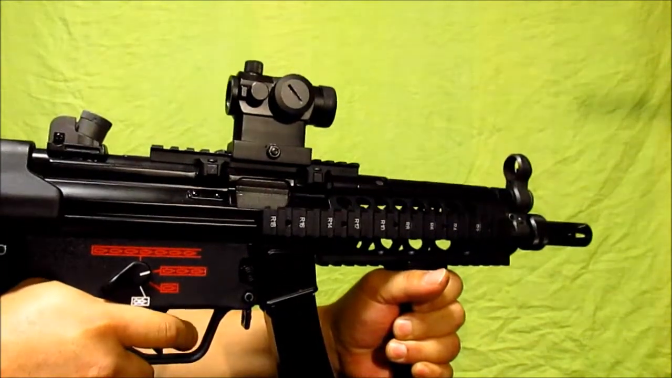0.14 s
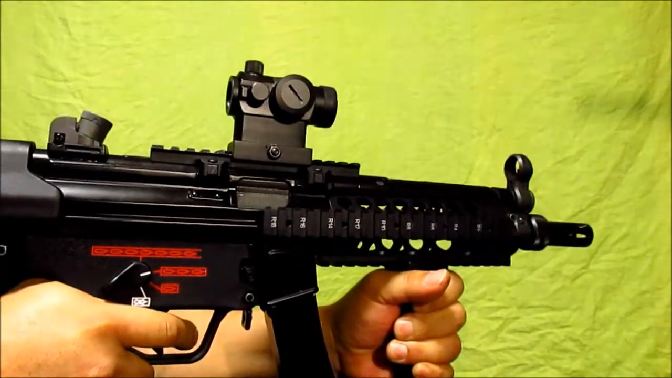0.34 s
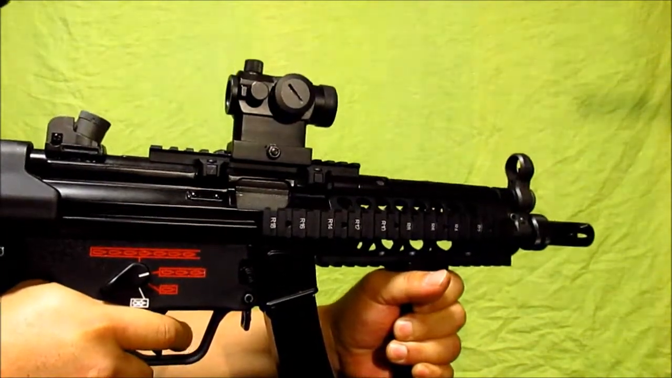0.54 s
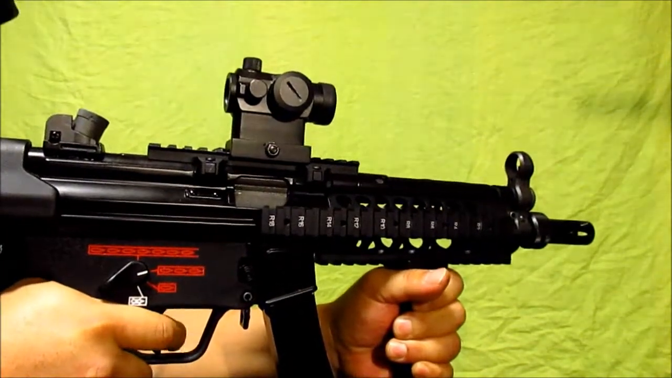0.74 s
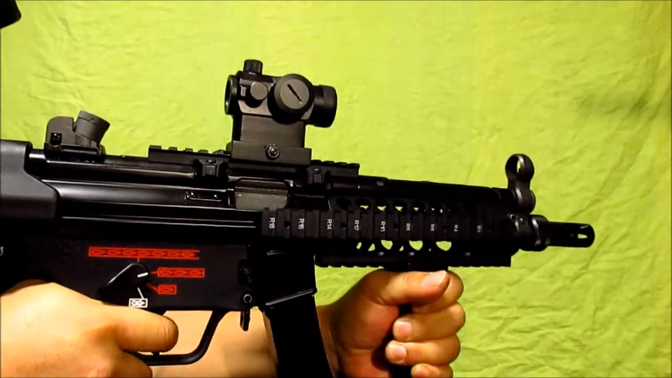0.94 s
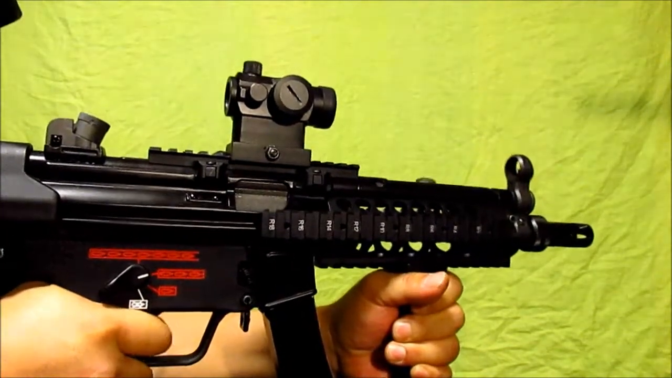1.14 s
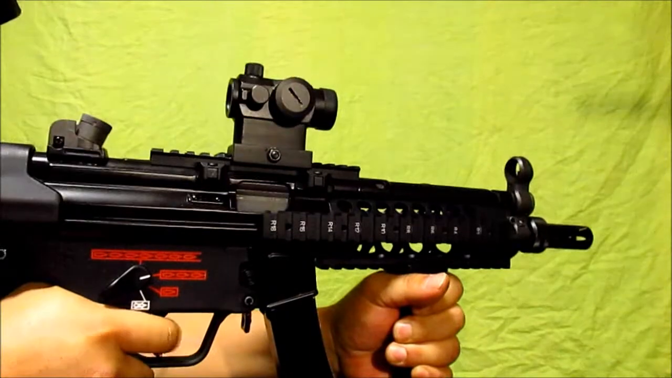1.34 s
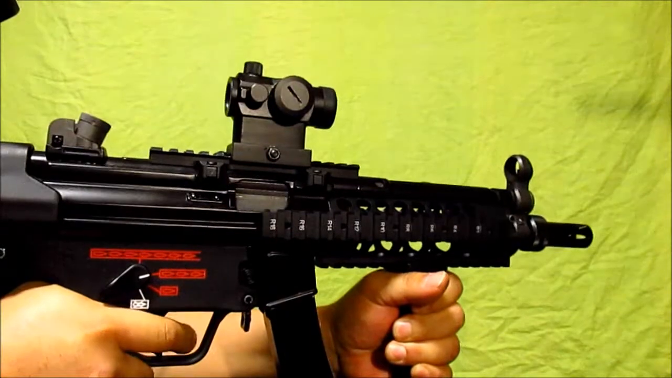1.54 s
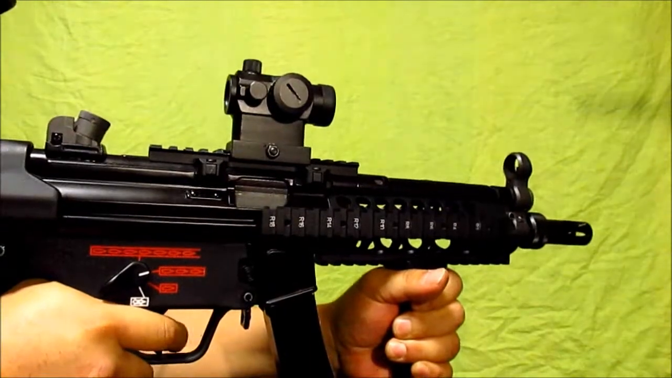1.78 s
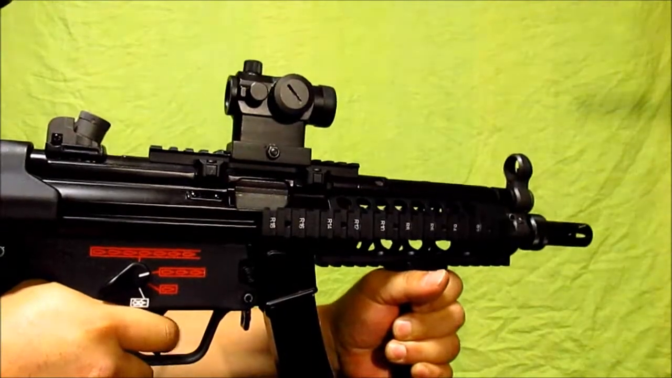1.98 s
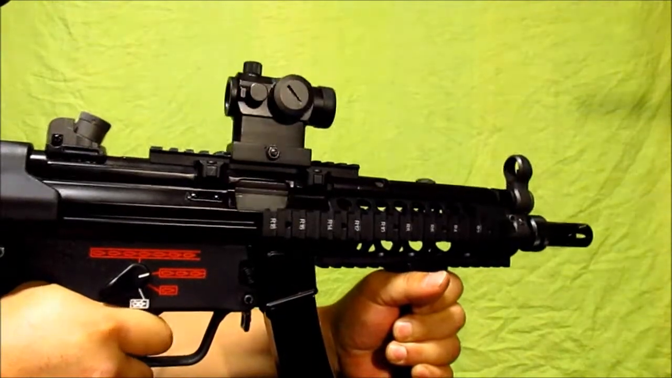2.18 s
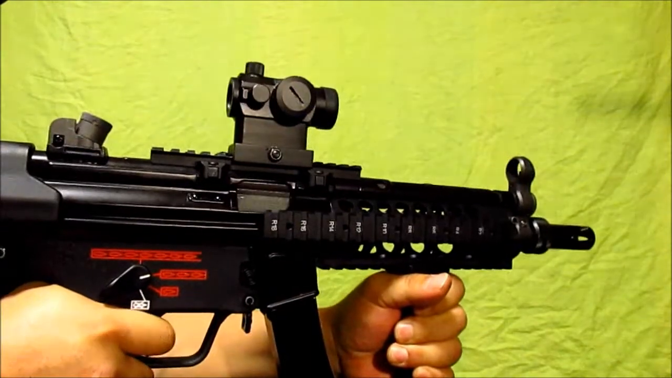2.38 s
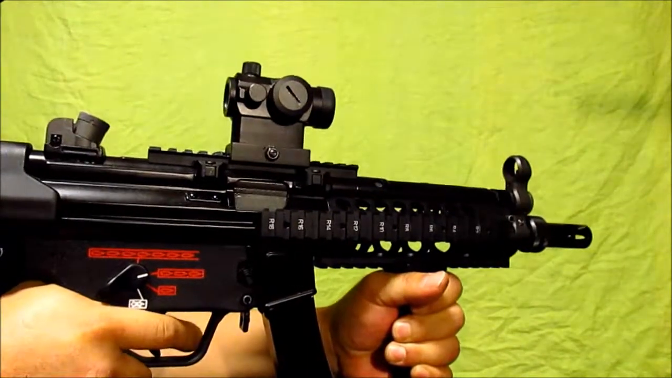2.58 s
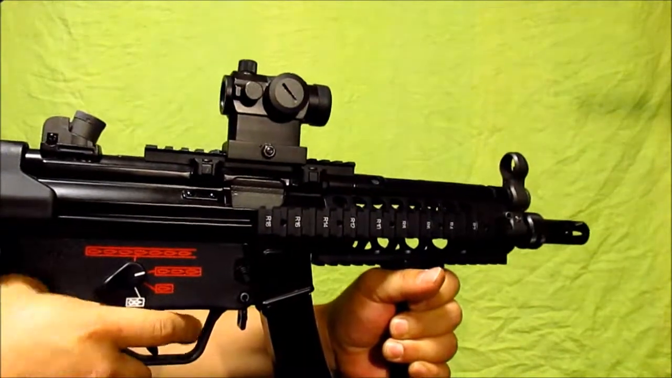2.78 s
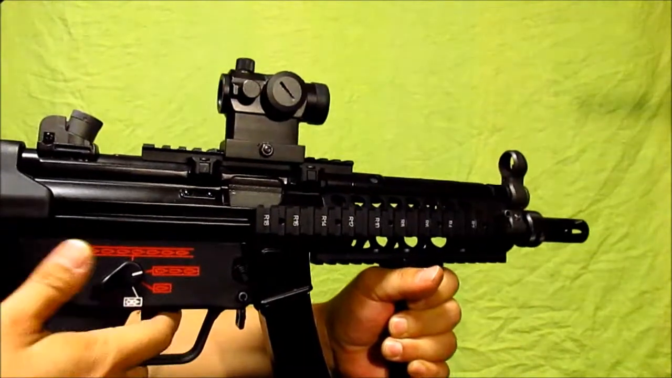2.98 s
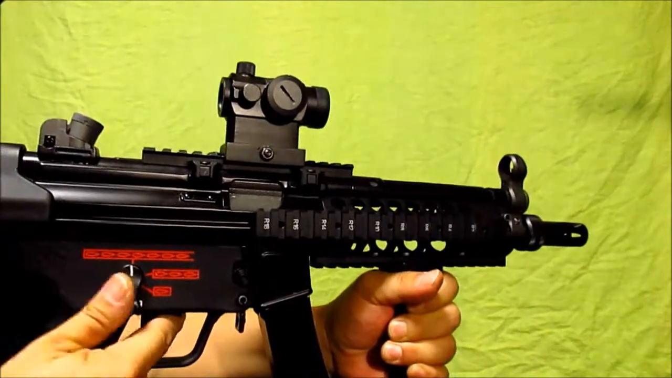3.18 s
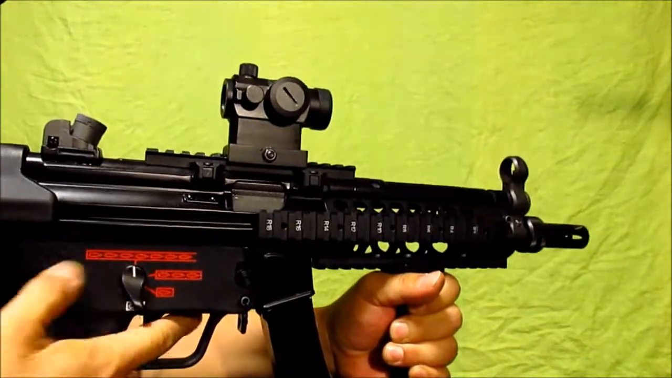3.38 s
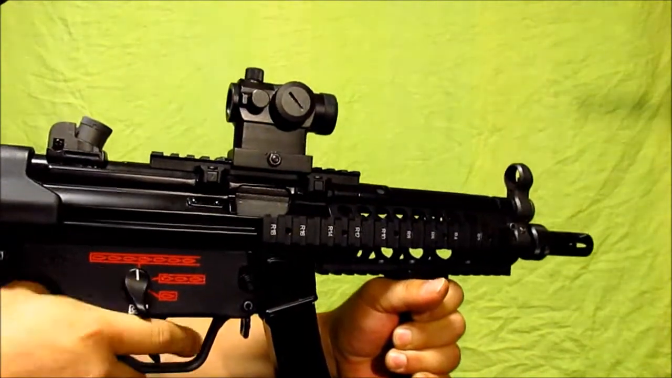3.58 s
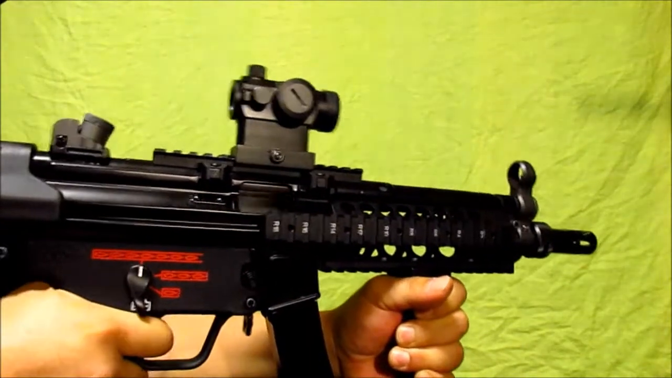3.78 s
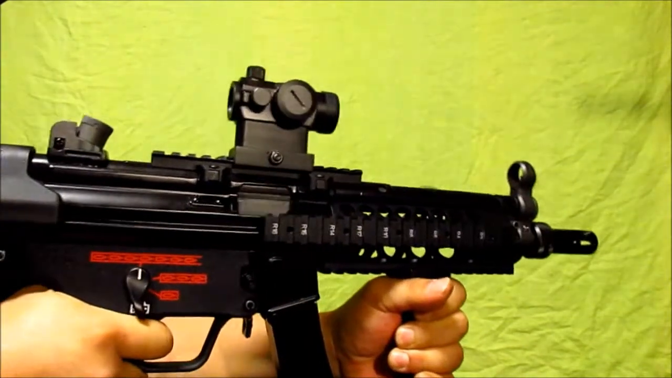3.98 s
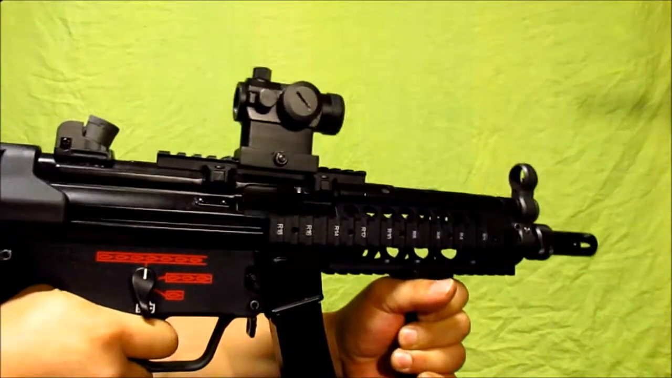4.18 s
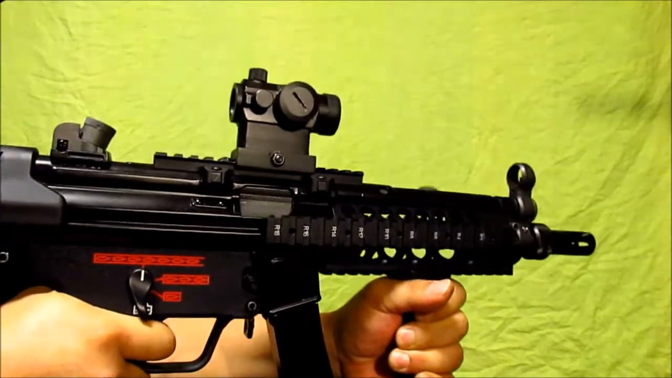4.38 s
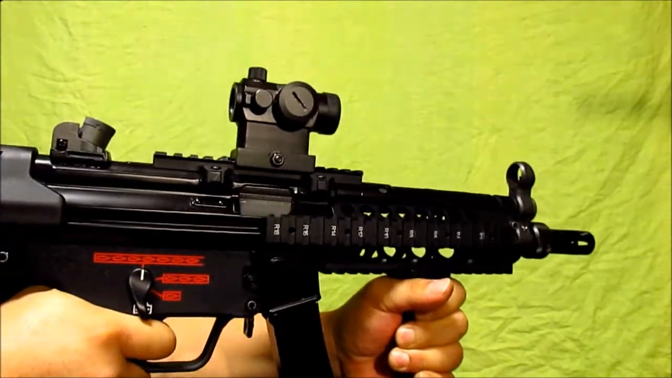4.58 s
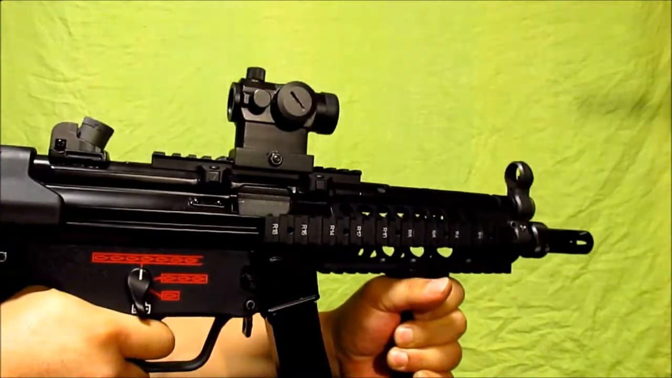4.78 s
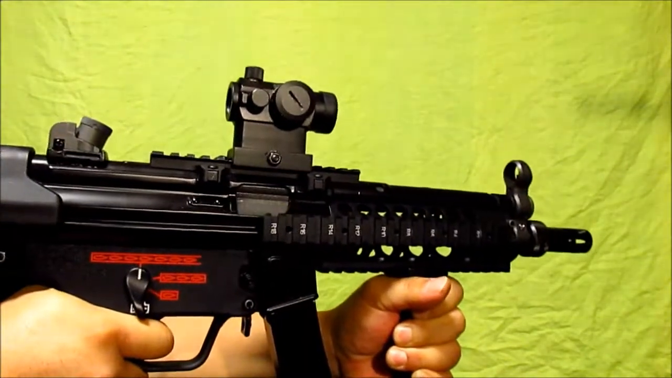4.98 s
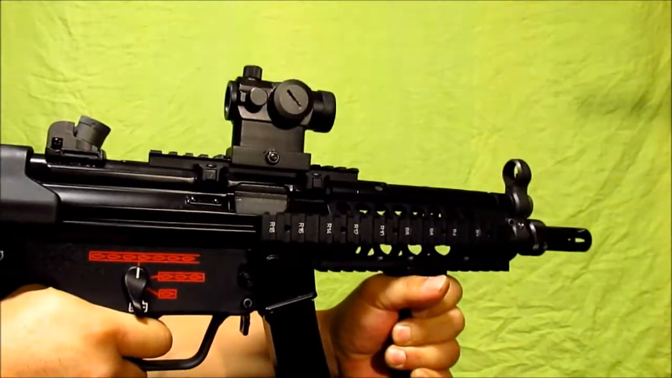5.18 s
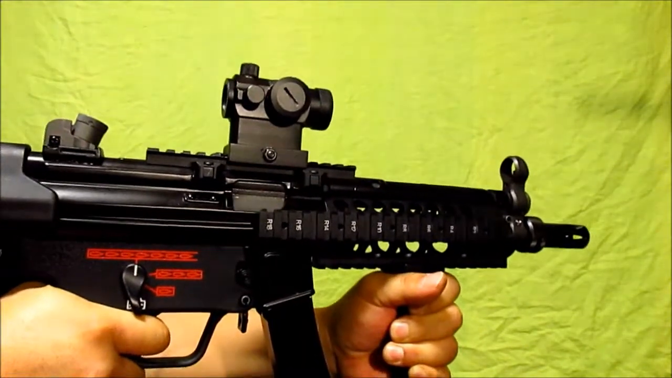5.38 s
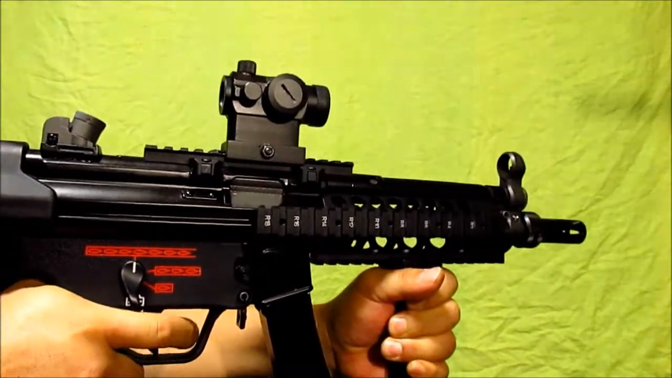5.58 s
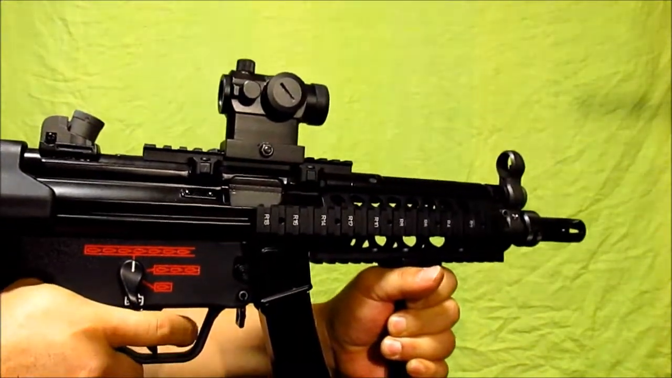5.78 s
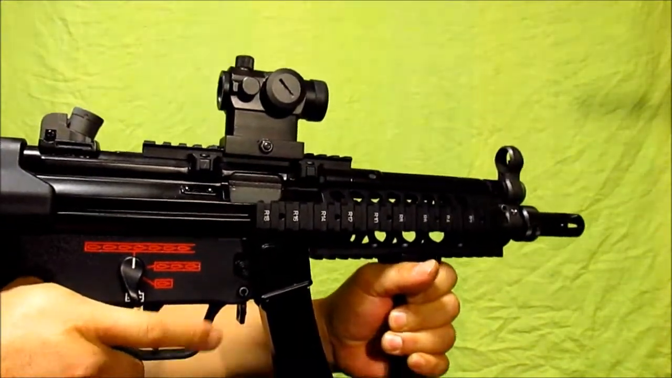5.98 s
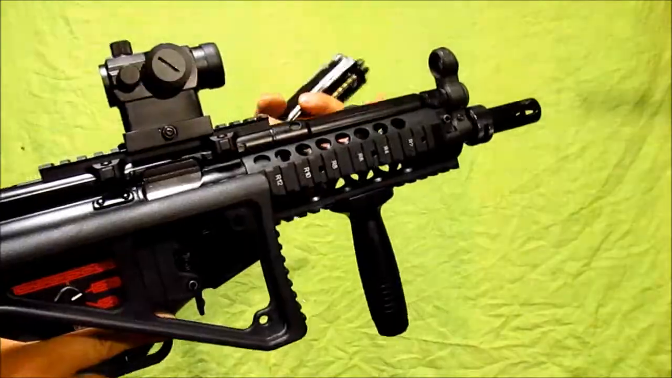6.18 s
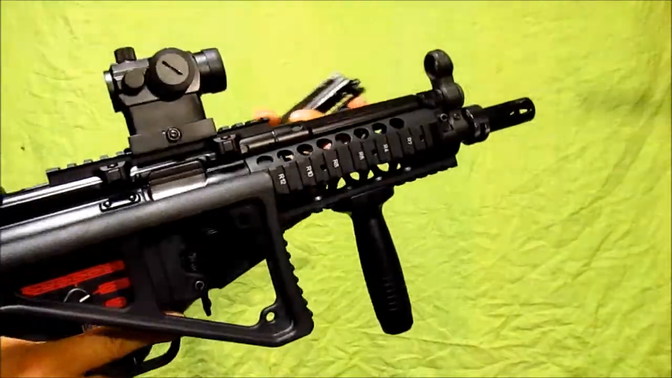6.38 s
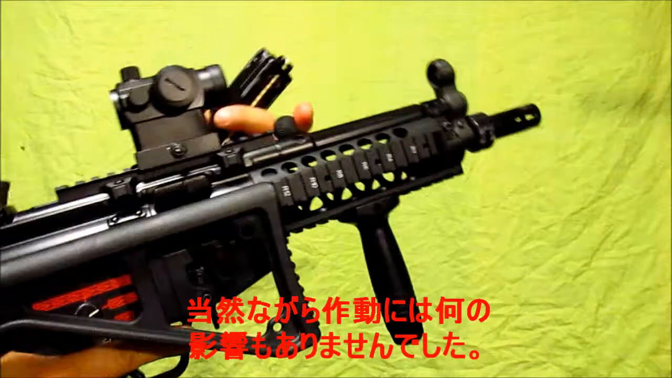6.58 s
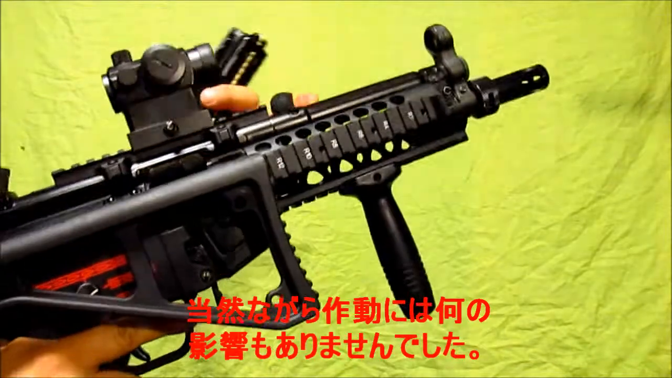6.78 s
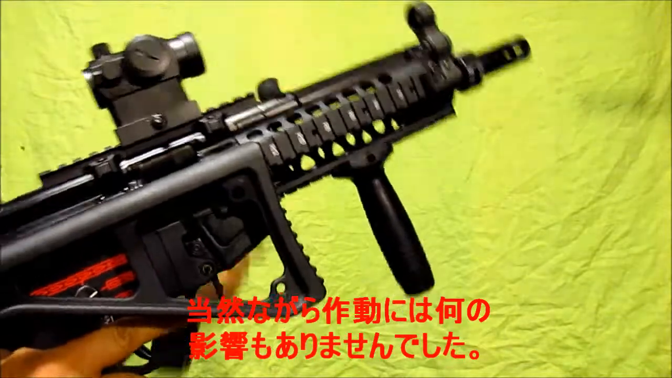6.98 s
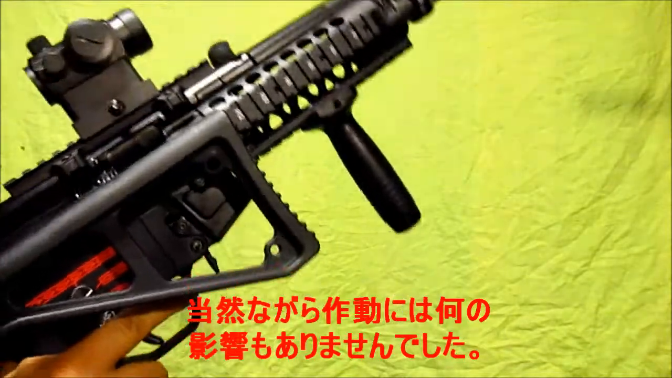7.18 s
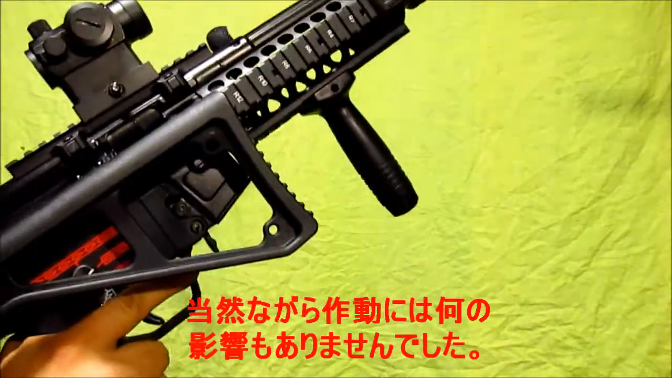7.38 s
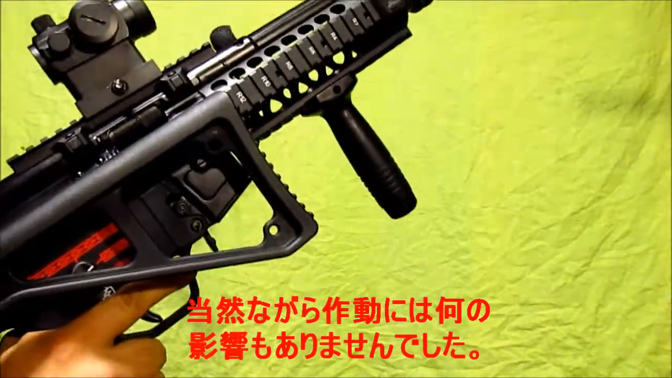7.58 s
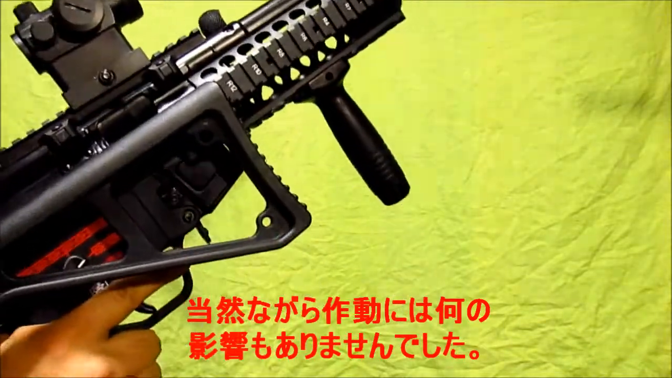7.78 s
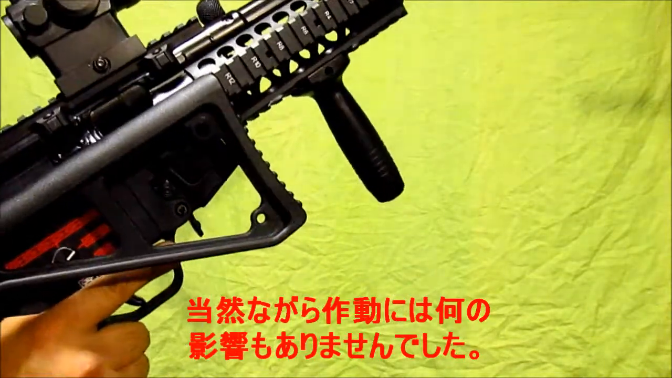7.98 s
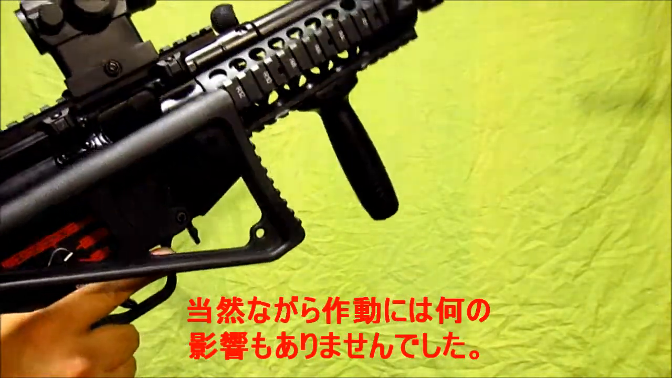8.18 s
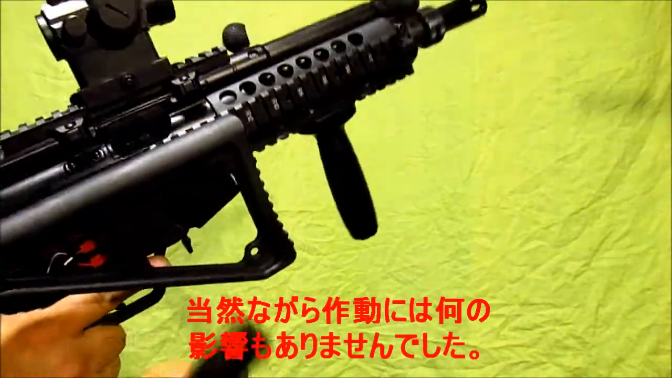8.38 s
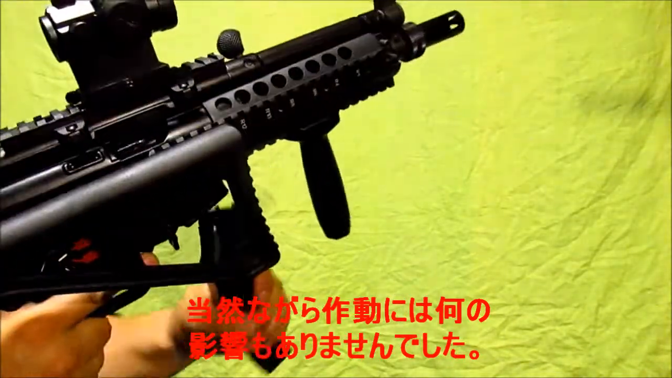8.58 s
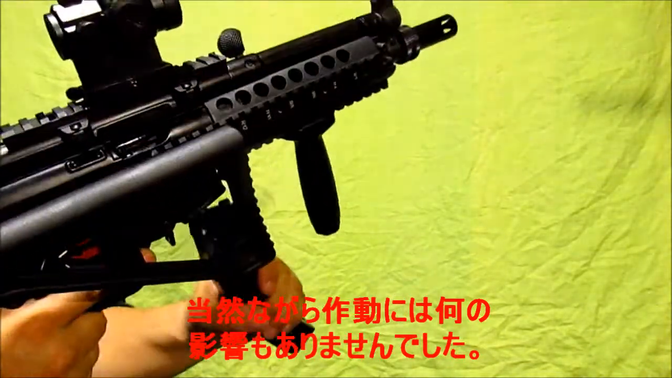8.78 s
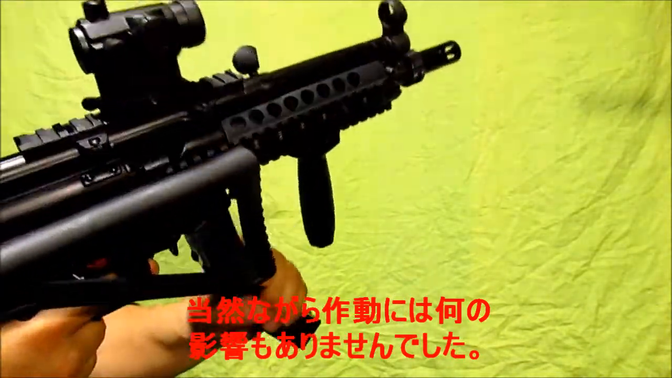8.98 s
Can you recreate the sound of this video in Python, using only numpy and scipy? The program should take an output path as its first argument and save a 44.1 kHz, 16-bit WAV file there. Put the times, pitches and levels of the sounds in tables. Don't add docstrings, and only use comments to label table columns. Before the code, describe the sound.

Three bursts of sharp, metallic, hissing airsoft shots in a quiet cloth-lined room, followed by trigger clicks, bolt clatter and magazine rattle.

```python
import sys
import numpy as np
from scipy import signal
from scipy.fft import rfft, irfft, next_fast_len
from scipy.io import wavfile
from scipy.ndimage import uniform_filter1d

SR = 44100
rng = np.random.default_rng(int(sys.argv[2]) if len(sys.argv) > 2 else 0)


def undo_db(level):
    steps = np.asarray(level, float) / 20
    return 10 ** steps


def store_pcm(level_fs):
    pcm = np.round(np.clip(level_fs, -1, 1) * 32767).astype(np.int16)
    wavfile.write(sys.argv[1], SR, np.atleast_2d(pcm).T)


N = 399105
TIME = np.arange(N) / SR
SIZE = next_fast_len(N + SR)
HZ = np.maximum(np.arange(SIZE // 2 + 1) * SR / SIZE, 1)

# t/s, peak level/dB
SHOTS = [(1.051, -4.5), (1.1275, -2.5), (1.2061, -1.5), (1.283, -3), (2.0444, -5.5), (2.1218, -5.5),
         (2.2001, -3), (2.278, -4), (3.7055, -5), (3.7853, -5), (3.8643, -3), (3.942, -2.5), (4.0201, -4),
         (4.097, -3.5), (4.1772, -1), (4.2553, -2), (4.3331, -4)]
# lead before the slam/ms, rise/ms, fall/ms
CYCLE = [
    (54, 1.4, 3.4),
    (49.5, .5, 5.9),
    (42.5, 0.67, 2.4),
    (40, 1.5, 6.4),
    (35.5, 0.2, 7.6),
    (29.5, 2.2, 6.1),
    (19, 0.54, 3.4),
    (5, 0.38, 2.3),
    (0, 0.35, 0.82),
    (-2, .5, 8),
    (-11, 1.4, 12),
]
# thump level/dB, shell level/dB, steel level/dB, gas level/dB
STAGE_SHAKE = [(-59.5, -21, -19.5, -17), (-44, -24, -21, -14.5), (-33.5, -35.5, -27.5, -23.5),
               (-60.5, -22.5, -18.5, -22.5), (-27, -21.5, -19, -16.5), (-43.5, -19, -16.5, -15),
               (-38, -21.5, -22.5, -26), (-54, -36, -31, -28), (-17, -13, 4, 0), (-34.5, -16.5, -8, -2.5),
               (-48, -32.5, -24, -24.5)]
REPEAT_SHARE = (0.9, .6, 0.24, .15)
# thump, shell, steel, gas [dB/s]
COOLING_DB_S = (-0.25, -0.48, -0.045, 0.36)
# t/s, level/dB
STOCK_POPS = [(1.015, -26.5), (2.008, -26.5), (3.67, -25.5)]
# t/s, level/dB
PULLS = [(0.9847, -28), (1.9785, -30), (3.64, -25.5)]
# delay after the sear/ms, steel level/dB, shell level/dB, gas level/dB, fall/ms
PULL_STEPS = [
    (-21.5, -28.5, -38.5, -30.5, 1.8),
    (0, -2, -10.5, 4, 1.1),
    (8.7, -8, -16.5, -20, 2.2),
    (12, -2.5, -7.5, 1, 1.9),
]
# t/s, level/dB, tube level/dB, brightness/dB, fall/ms
LOCK = [(6.267, -6, -16.5, 2.5, 0.81), (6.27, -25.5, -4.5, -3.5, 9.7), (6.354, -19, -8, -11, 1.2),
        (6.3884, -19.5, 3, 16, 1.9), (6.394, -11.5, -20.5, -1, 1.2), (6.41, -18.5, 6, -5.5, 1.6),
        (6.42, -16, -1.5, -13.5, 1.9), (6.4329, -15, 6.5, 2, 0.92), (6.436, -20, 10, -12.5, 4.5),
        (6.4465, -8.5, -7, 3.5, 1.2), (6.447, -14.5, 7.5, 6, 2.6), (6.462, -35.5, -9, 5, 2),
        (6.4832, -33.5, 9.5, 9, 1.2), (6.5434, -30.5, -3.5, -2.5, 3.4), (6.565, -43.5, -19.5, -3.5, 1.5),
        (6.609, -50, 3.5, -16, 2.2)]
# t/s, level/dB, brightness/dB, fall/ms
INSERT = [(8.8592, -16.5, -12, 3.1), (8.872, -22, -3.5, 1.9), (8.886, -31, -13, 2.7), (8.9, -27, -15, 1.2),
          (8.9497, -27.5, -5, 2.2), (8.9546, -25, 0.5, 1.5), (8.9759, -34, 4.5, 1.9),
          (8.984, -31, 1.5, 2.4), (8.991, -28, 3, 2.5), (9.004, -29, -8, 5.7)]
# t/s, level/dB, brightness/dB
TICKS = [(3.068, -56, -4), (3.0966, -47, -1.5), (3.506, -70.5, 14), (5.392, -52.5, -8), (5.404, -40, -19),
         (5.4244, -68.5, 7), (5.4516, -57, 4), (5.964, -59, 6), (6.0078, -67, 5), (6.023, -54.5, -17),
         (6.1197, -48.5, 2.5), (6.844, -49, -27.5), (7.004, -58.5, 10.5)]
# t/s, level/dB, rise and fall/ms
RUBS = [(2.74, -81, 20), (3.05, -72, 8), (3.318, -61, 16.5), (3.515, -75, 16), (5.93, -78, 22),
        (6.055, -65.5, 17)]
# t/s, level/dB, dullness/dB
PELLETS = [(0.1455, -72.5, 16), (0.1653, -61.5, 4), (0.259, -73, 9), (0.2846, -72.5, 15.5),
           (1.485, -61.5, 9.5), (1.532, -65, 10), (1.596, -57, 2.5), (1.603, -60, -3), (2.491, -66.5, 11.5),
           (2.5413, -67.5, 16), (2.5501, -63, 7), (2.5646, -70.5, 17), (2.604, -72, 11.5),
           (4.458, -66.5, 12.5), (4.508, -65, 11.5), (4.578, -67, 12.5), (4.596, -60.5, 5), (4.63, -63, 6),
           (4.645, -67, 10)]

# f/Hz, width/Hz, level/dB
THUMP = [(150.3, 1000, -0.5), (61, 65, -14.5), (450, 200, -14.5)]
SHELL = [(798.5, 82, -4), (993, 90, 7.5), (1140, 300, -12), (1244, 110, 8), (1770, 220, -18),
         (700, 150, -12.5), (1128, 830, 2.5)]
STEEL = [(2380, 120, -5.5), (2356, 58, 9.5), (2600, 50, -7), (2854, 190, 15), (3100, 150, 2),
         (3364, 260, 15.5), (3510, 67, -17.5), (4300, 1000, -9.5), (3144, 1990, 11.5)]
GAS = [(6040, 640, -13), (6330, 43, 10.5), (7860, 610, 4.5), (8420, 370, -9), (9400, 640, -1.5),
       (11100, 110, 23), (11600, 1500, -13), (14400, 600, -5), (9000, 12000, 17)]
TUBE = [(1227, 81, 5.5), (1504, 110, -5.5), (1047, 360, -7), (1922, 410, -3.5), (594, 550, -13.5)]
MAGAZINE = [(1232, 200, -2), (1552, 150, -1), (1835, 260, -6), (2845, 160, -8), (5500, 350, -12),
            (483, 210, -9.5)]
GEAR = [(5270, 395, -1), (6900, 560, -4), (8250, 250, 4.5), (10060, 500, -2), (12200, 440, -2.5),
        (13710, 300, -6), (15000, 400, -9.5)]
STOCK = [(360, 16, 0)]
# resonances, low edge f/Hz, high edge f/Hz, share alike at both ports
PARTS = [(THUMP, 110, 490, .7), (SHELL, 160, 1800, 0.99), (STEEL, 360, 7600, 0.14),
         (GAS, 5300, 13000, 0.39), (TUBE, 520, 1300, .9), (MAGAZINE, 250, 5600, 0.98),
         (GEAR, 3500, 20000, 0.45), (STOCK, 350, 600, 0.81)]
# f/Hz, t60/s, level/dB
PINS = [(13350, .3, -22), (14790, .22, -21.5), (12050, .25, -37.5), (3280, .2, -28.5), (1264, 0.06, -24)]
# f/Hz, left minus right level/dB
GUN_LEFT = [(60, -5.5), (110, 1.5), (200, 3), (380, 4.5), (700, 1), (1290, 1.5), (2380, -1), (4400, 0.0),
            (8120, 4.5), (15000, 0.5)]
# f/Hz, t60/s, level/dB
ROOM = [(150, 0.42, -22.5), (585, 0.25, -13), (2020, .24, -15), (5030, .22, -13.5), (12000, 0.13, -13.5)]

# t/s, spread/s, level/dB
SCRAPE = [(7.66, 0.12, -54.5), (8.15, 0.026, -55), (8.24, .03, -51.5), (8.53, 0.063, -51),
          (8.75, 0.1, -45.5)]
# multiple of the turn rate, level/dB
MOTOR = [(1, -7), (2, -1.5), (3, -20), (8, -12), (9, -12.5), (11, -16.5), (14, -20), (16, -30.5), (21, -20)]
# t/s, level/dB
GAIN = [(0, -59), (.95, -55), (1.4, -58), (1.948, -55.5), (2.399, -57.5), (3.6, -52.5), (3.701, -61.5),
        (4.33, -66.5), (4.45, -57.5), (6.125, -50.5), (6.136, -37.5), (6.39, -38.5), (6.45, -55.5),
        (6.55, -56.5), (7.401, -42.5), (9.05, -35.5)]
# f/Hz, level/dB
AIR = [(15, -15.5), (30, -13.5), (55, -14.5), (82, -18), (95, -6), (125, -3.5), (150, -14.5), (300, -14.5),
       (450, -18), (900, -20), (1140, -26.5), (1510, -25), (2500, -36.5), (3300, -71)]
# f/Hz, density level/dB
HISS = [(1200, -30), (2000, -8), (3000, -5.5), (5400, -8), (6200, -11), (9800, -12), (12500, -14.5),
        (14500, -22), (15500, -31)]
# f/Hz, level against the hiss/dB
WHINE = [(5335, -21.5), (7440, -17), (8495, -17.5), (9491, -16), (12457, -20)]
MOTOR_HZ = 22.11


def unit(x):
    return x / np.sqrt(np.mean(np.abs(x) ** 2))


def colour(x, gain):
    return irfft(rfft(x, SIZE) * gain, SIZE)[..., :N]


def spectrum(points):
    hz, db = np.transpose(points)
    return undo_db(np.interp(np.log(HZ), np.log(hz), db))


def walk(rate_hz):
    hold = int(SR / rate_hz)
    steps = np.repeat(rng.standard_normal(N // hold + 1), hold)
    return unit(uniform_filter1d(steps, hold)[:N])


def add(force, s, rise_ms, fall_ms, gain, wave=None):
    start = int(s * SR)
    length = min(int((rise_ms + 8 * fall_ms) * SR / 1000), N - start)
    ms = np.arange(length) * 1000 / SR
    rise = np.minimum(ms / max(rise_ms, .05), 1)
    fall = np.exp(-np.maximum(ms - rise_ms, 0) / max(fall_ms, .2))
    knock = np.outer(gain, rise * fall)
    force[:, start:start + length] += knock ** 2 if wave is None else knock * wave[:, :length]


def resonances(modes, low_hz, high_hz):
    def edge(ratio):
        return 1 / (1 + 1j * np.sqrt(2) * ratio - ratio * ratio)

    rings = 0
    for k, (f_hz, width_hz, db) in enumerate(modes):
        rings = rings + (-1) ** k * undo_db(db) / (1 + 1j * (HZ - f_hz * f_hz / HZ) / width_hz)
    return unit(rings * edge(HZ / high_hz) * np.conj(edge(low_hz / HZ)))


def gun():
    loose, blows = forces()
    loose *= unit(undo_db(1.6 * rng.exponential(size=N)))
    sound = rfft(blows[2], SIZE) * pin_resonances() * undo_db(-6.0)
    for force, blow, (modes, low_hz, high_hz, alike) in zip(loose, blows, PARTS):
        shared, *own = rng.standard_normal((3, N))
        noise = np.sqrt(min(alike, 1)) * shared + np.sqrt(max(1 - alike, 0)) * np.array(own)
        sound = sound + rfft(blow + force * noise, SIZE) * resonances(modes, low_hz, high_hz)
    late = np.exp(-1j * 1.5 / (1 + HZ / 300))
    return irfft(sound * np.array([np.ones_like(late), late]), SIZE)[:, :N]


def pin_resonances():
    pins = 0
    for f_hz, t60_s, db in PINS:
        ring = 1 / (1 + 1j * (HZ - f_hz) * np.pi * 2 * t60_s / np.log(1000))
        pins = pins + undo_db(db) * ring * np.sqrt(t60_s * SR)
    return pins


def forces():
    power, blows = np.zeros((2, len(PARTS), N))
    fire(power, blows)
    pull_trigger(power)
    handle(power)
    hit_target(power)
    scrape_gear(power)
    return np.sqrt(power), blows


def fire(power, blows):
    alike = np.clip(REPEAT_SHARE, 0, 1)
    waves = rng.standard_normal((len(CYCLE), 4, SR // 4))
    waves[:, 0] = (-1.) ** np.arange(len(CYCLE))[:, None] * undo_db(-10.0)
    previous_s = 0
    for s, peak_db in SHOTS:
        first = s - previous_s > .2
        previous_s = s
        shot_db = 3.5 if first else 1
        for k, ((lead_ms, rise_ms, fall_ms), shake_db) in enumerate(zip(CYCLE, STAGE_SHAKE)):
            late, *vary = rng.standard_normal(5)
            if k == 0 and first:
                continue
            slam = k in (8, 9)
            db = np.array(shake_db) + (peak_db - 6.5 if slam else shot_db)
            db = db + (s - 3.0) * np.array(COOLING_DB_S) + 1.5 * np.array(vary)
            jitter_ms = 0 if slam else .4 * late
            at_s = s - (lead_ms + jitter_ms) / 1000
            add(power[:4], at_s, rise_ms, fall_ms, undo_db(db) * np.sqrt(1 - alike))
            add(blows[:4], at_s, rise_ms, fall_ms, undo_db(db) * np.sqrt(alike), waves[k])
    for s, db in STOCK_POPS:
        add(blows[7:], s, .3, .6, undo_db([db]), np.ones((1, SR)))


def pull_trigger(power):
    for s, pull_db in PULLS:
        for delay_ms, steel_db, shell_db, gas_db, fall_ms in PULL_STEPS:
            gain = undo_db(pull_db + np.array([shell_db, steel_db, gas_db]))
            add(power[1:4], s + delay_ms / 1000, .25, fall_ms, gain)
    add(power[1:4], 4.3573, 1.1, 2.3, undo_db(np.array([-20.5, -17, -6.5])))


def handle(power):
    tube_db, magazine_db = [0, -np.inf], [-np.inf, 0]
    knocks = [(s, db, tube_db, -6, top_db, 1.8) for s, db, top_db in TICKS]
    knocks += [(s, db, tube_db, *rest) for s, db, *rest in LOCK]
    knocks += [(s, db, magazine_db, 1.5, *rest) for s, db, *rest in INSERT]
    for s, db, part_db, body_db, top_db, fall_ms in knocks:
        rise_ms = 0.15 + 0.064 * fall_ms
        body = body_db + np.array(part_db)
        add(power[2:6], s, rise_ms, fall_ms, undo_db(db - 0.5 + np.array([0, top_db, *body])))
        add(power[:1], s, rise_ms, 2 * fall_ms, undo_db([db - 24.5]))
    for s, db, ms in RUBS:
        add(power[1:4], s, ms, ms, undo_db(db + np.array([-6, 0, 5.5])))


def hit_target(power):
    for s, db, dull_db in PELLETS:
        tap_db = np.array([dull_db - 2.5, dull_db + 2.0, -3, -21.5])
        add(power[:4], s, 0.8, 2.8, undo_db(db + tap_db))
        add(power[1:3], s, 8, 25, undo_db(db - 8.5 + np.array([dull_db, -2])))


def scrape_gear(power):
    for s in 8.2 + np.arange(-12, 33) / MOTOR_HZ:
        spell_db = max(db - 6 * ((s - at_s) / spread_s) ** 2 for at_s, spread_s, db in SCRAPE)
        idle_db = np.interp(s, *np.transpose(GAIN)) - 22
        add(power[6:7], s, 4, 14, undo_db([max(spell_db, idle_db)]))


def room(x):
    t = np.arange(SR // 2) / SR
    centres = np.log([hz for hz, _, _ in ROOM])
    answer = 0
    for share, (_, t60_s, db) in zip(np.eye(len(ROOM)), ROOM):
        tail = rng.standard_normal((2, len(t))) * undo_db(-60 * t / t60_s) * np.minimum(t / 0.0058, 1)
        tail *= undo_db(db + 10.5) * np.sqrt(2 * np.log(1000) / t60_s / SR)
        answer = answer + rfft(tail, SIZE) * np.interp(np.log(HZ), centres, share)
    return colour(x, answer), irfft(answer, SIZE)


def earlier_shot(answer):
    skip = int(.075 * SR)
    sound = undo_db(-12.5 + 19.5) * answer[:, skip:skip + N] * (TIME < .4)
    for f_hz, t60_s, db in PINS[:2]:
        sound = sound + undo_db(db - 46) * np.sin(2 * np.pi * f_hz * TIME) * undo_db(-60 * TIME / t60_s)
    return sound


def motor():
    turn = 2 * np.pi * np.cumsum(MOTOR_HZ * (1 + 0.0058 * walk(1.5))) / SR
    return sum(undo_db(db + 0.68 * walk(5)) * np.sin(k * turn + rng.uniform(0, 7)) for k, db in MOTOR)


def room_air():
    mid, side = rng.standard_normal((2, N))
    apart = np.clip(HZ / 1200, .5, 1.2)
    air = colour(mid, spectrum(AIR)) + colour(side, spectrum(AIR) * apart) * np.array([[1], [-1]])
    return undo_db(-6.5) * unit(air) * undo_db(.5 * walk(8.5))


def electronics():
    drift = walk(4)
    hiss = unit(colour(rng.standard_normal((2, N)), spectrum(HISS)))
    return hiss + sum(undo_db(db) * np.sin(2 * np.pi * hz * TIME + 4 * drift) for hz, db in WHINE)


def quiet():
    hum_db = np.interp(TIME, *np.transpose(GAIN))
    hiss_db = -74 + 1.06 * (hum_db + 50.5) + 6 * (TIME > 6.13)
    left = undo_db(np.array([[1.5], [-1.5]]))
    return left * ((motor() + room_air()) * undo_db(hum_db) + electronics() * undo_db(hiss_db))


def scene():
    near = gun()
    echoes, answer = room(near)
    duck = undo_db(-4.5 * (abs(TIME - 6.53) < .4))
    tilt = np.sqrt(spectrum(GUN_LEFT))
    loud = near + echoes * duck + earlier_shot(answer)
    return colour(loud, np.array([tilt, 1 / tilt])) + quiet()


def roll_off(x):
    return signal.sosfilt(signal.butter(12, 16830, fs=SR, output="sos"), x)


def record(dry):
    notch = 1 - .85 / (1 + 1j * (HZ - 7870) / 70)
    top = 1 / np.sqrt(1 + (HZ / 15600) ** 200) + undo_db(-36)
    mix = colour(np.tanh(dry * 1.084) / 1.144, notch * top)
    return roll_off(mix)


dry = scene()
out = record(dry)
store_pcm(out)
```